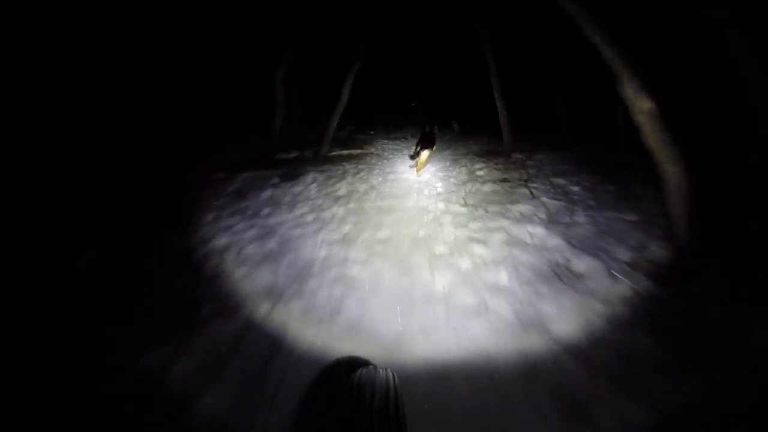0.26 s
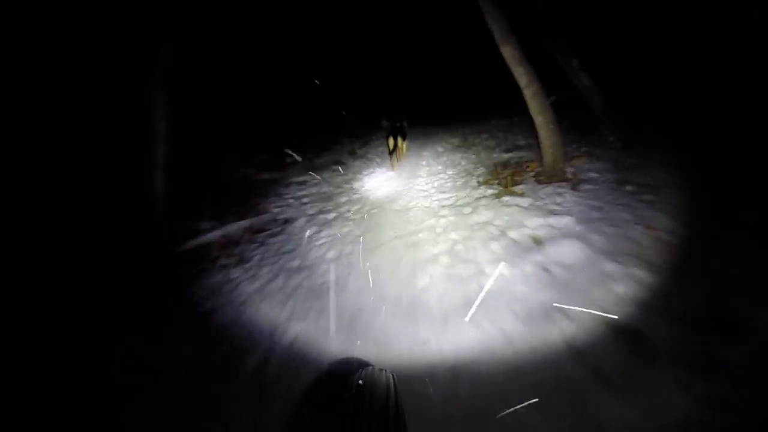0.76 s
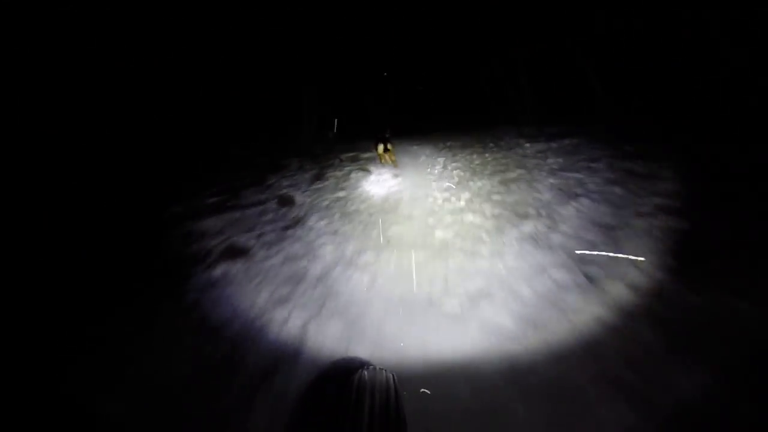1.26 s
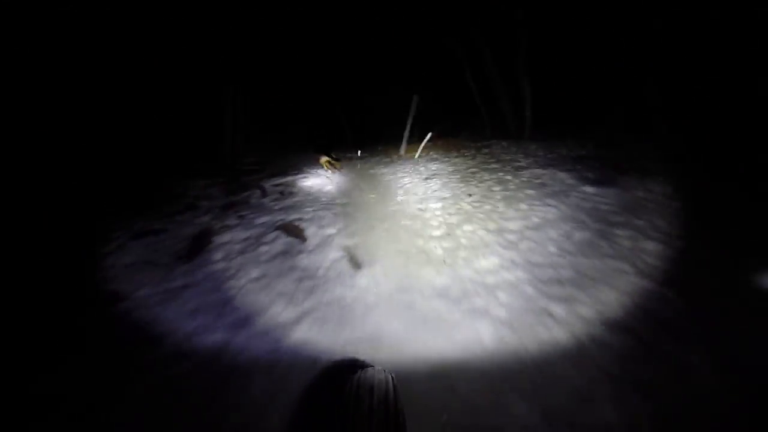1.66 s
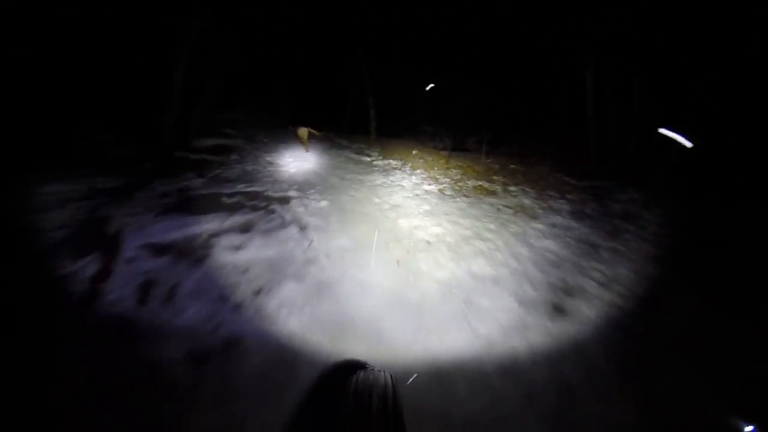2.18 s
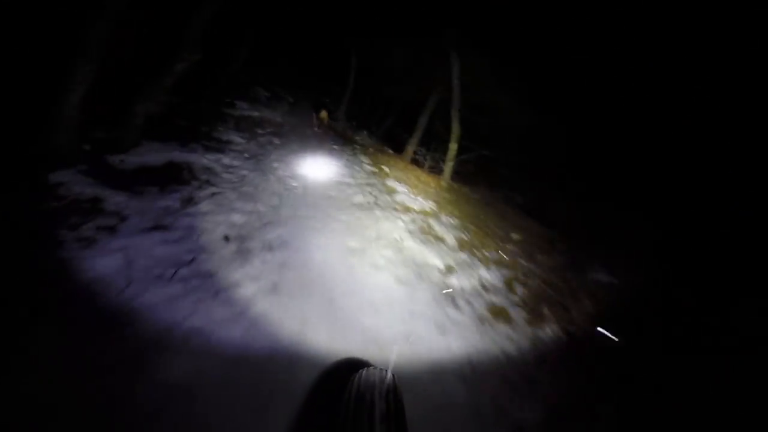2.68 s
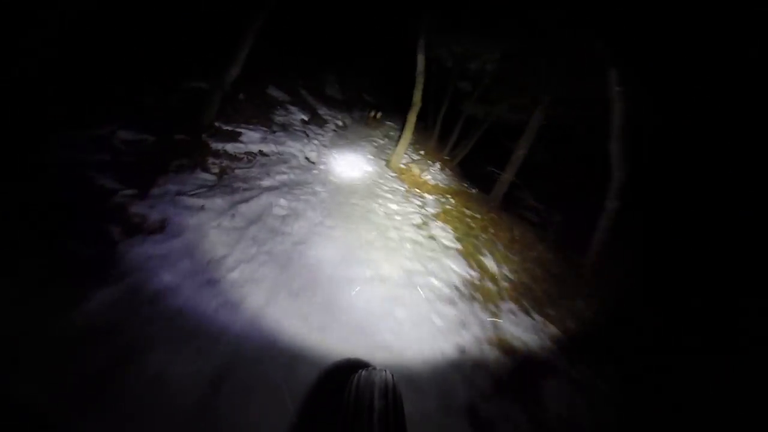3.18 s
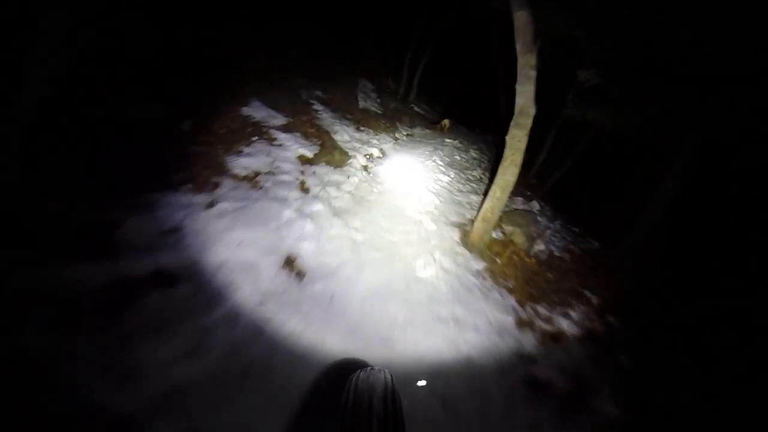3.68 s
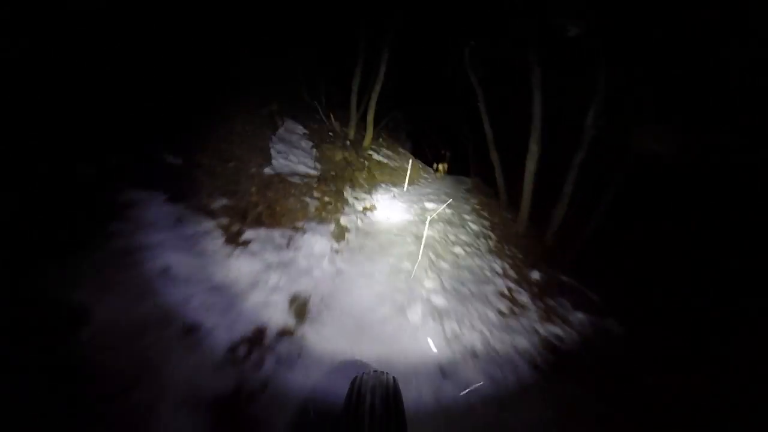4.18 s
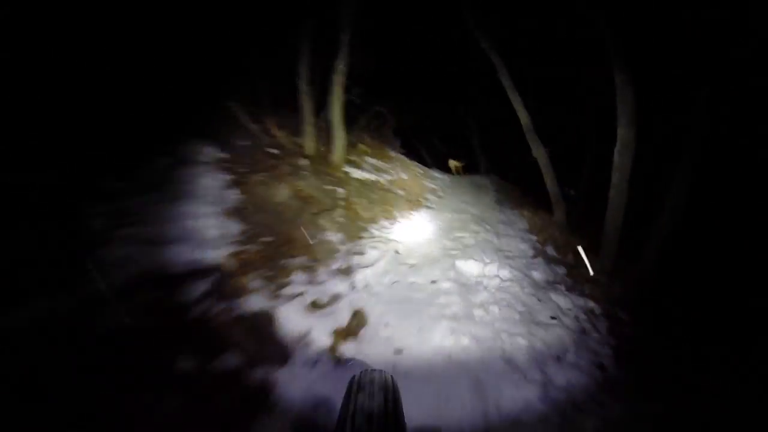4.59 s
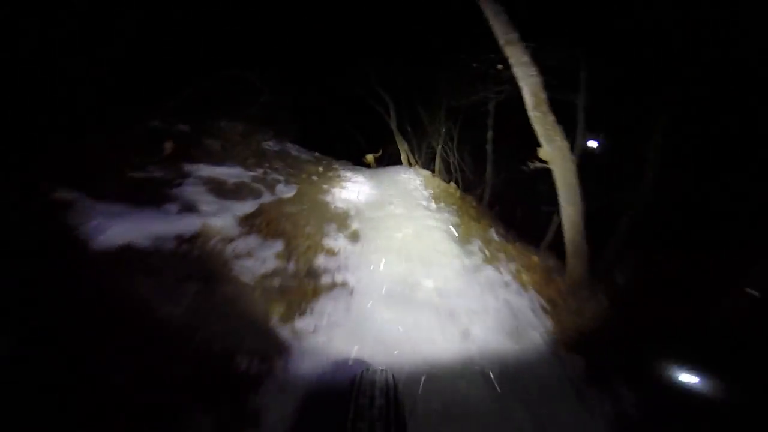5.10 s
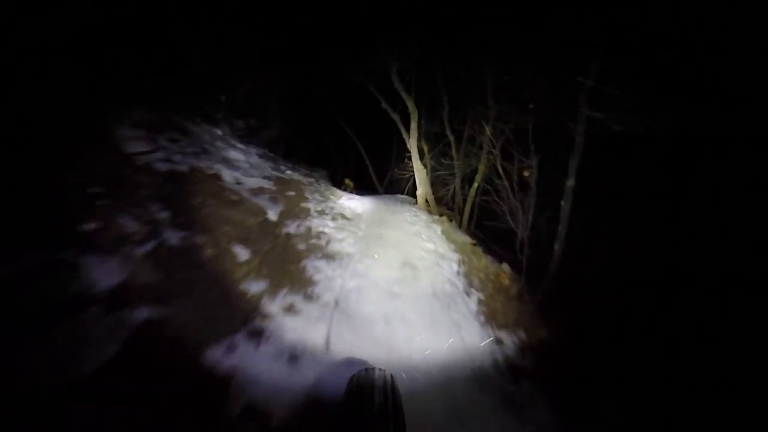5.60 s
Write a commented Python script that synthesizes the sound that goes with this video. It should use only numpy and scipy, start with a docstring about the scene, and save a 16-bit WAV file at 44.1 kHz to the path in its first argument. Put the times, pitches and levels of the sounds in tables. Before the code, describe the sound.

Deep rolling rumble and gritty snow crunch, close on a bike, with case ticks, chain clacks, short brake chirps and low wind buffeting.

```python
"""You hear a deep rumble and crunching snow, with icy ticks, clacks and a brake that hisses and sings.
A fat bike rolls fast down a snowy trail, heard from a cased camera on the handlebar.
The load on the tyres drives rumble and crunch: noise and tiny impacts ring the mount, bar and case.
Crumbs, clacks and knocks are short pushes into resonances; the brake is narrow noise and wavering tones.
Behind it all, low noise makes the buffeting of the headwind."""
import sys
import numpy as np
from scipy import signal
from scipy.fft import rfft, irfft
from scipy.io import wavfile
from scipy.ndimage import uniform_filter1d, minimum_filter1d

SR = 44100
rng = np.random.default_rng(int(sys.argv[2]) if len(sys.argv) > 2 else 0)


def digitize_waveform(pressure):
    """Quantize a signal to 16-bit integers and store it at the path in sys.argv[1].

    Rows of a 2-D input are taken as channels; values are limited to [-1, 1].
    """
    field = np.atleast_2d(pressure).T
    bounded = np.clip(field, -1, 1)
    quanta = np.round(bounded * 32767).astype(np.int16)
    wavfile.write(sys.argv[1], SR, quanta)


N = 257984
T = np.arange(N) / SR  # time in seconds

# Levels in the tables are relative: the layers add their own trims in dB.
# How hard the ground loads the tyres. Each row: time in seconds, load in dB.
RIDE = [(0.0, -15), (0.19, -17.5), (0.49, -18.5), (1.43, -16.5), (2.17, -18.5), (2.36, -14), (2.85, -15.5),
        (3.06, -15.5), (3.52, -13), (4.01, -14), (4.35, -17), (4.97, -18), (5.34, -21.5), (5.85, -20.5)]
# The bike goes light behind a crest. Each row: middle in seconds, length in seconds, drop of the load in dB.
LIFTS = [(0.184, 0.03, 17), (0.454, .045, 5.5), (.595, 0.049, 10), (.685, 0.019, -0.5), (1.057, 0.032, 7),
         (1.754, 0.021, 15), (2.06, 0.075, 6), (2.195, 0.034, 6.5), (2.52, 0.12, 2), (3.1, 0.044, 6.5),
         (3.545, 0.076, 6), (4.385, 0.037, 4), (5.275, 0.077, 12), (5.49, 0.15, 4)]
# The tyres dig into crust and scrunch. Each row: middle in seconds, length in seconds, rise of crunch in dB.
DIGS = [(.13, 0.027, -2), (.96, 0.064, 8.5), (1.725, 0.016, 4.5), (1.92, .08, 4), (2.045, 0.017, 10),
        (2.28, 0.15, 5.5), (2.8, 0.21, 4.5), (3.49, 0.14, 2), (3.96, 0.12, 8), (5.73, 0.038, 3.5)]
# Firm ground sets the bar humming. Each row: time in seconds, hum against the rumble in dB.
FIRMNESS = [(0, -5.5), (.9, -3), (1.7, -7.5), (2.6, -5), (3.2, -4.5), (4.15, -7.5), (5.85, -5.5)]
# Bumps in the trail. Each row: time in seconds, swing of the mount in dB, thud in dB.
BUMPS = [(0.114, -2, -14.5), (0.239, -4.5, -18), (0.324, -2, -31), (0.402, -4.5, -21), (.53, -2, -11),
         (0.72, -3, -15.5), (1.453, -7, -28), (1.524, -4, -19), (1.713, -3, -13.5), (1.941, 1, -21),
         (1.999, -6.5, -19), (2.126, -3, -19), (2.791, -12, -22), (2.862, 4.5, -32), (3.305, -4, -43),
         (3.481, -6, -14), (4.081, -6, -20), (4.136, -4.5, -23), (4.424, -4, -28), (4.764, -7, -43),
         (4.942, -3, -20), (4.995, -5, -41), (5.182, -6, -29), (5.355, -13, -41)]
# Snow thrown up by the front tyre. Each row: time in seconds, fine spray in dB.
SPRAY = [(0, -60), (1.2, -66), (1.8, -62), (2.3, -60), (3.1, -73), (3.6, -70), (4.3, -67), (5.85, -72)]
# Larger clumps of snow bursting on the case. Each row: time in seconds, level in dB.
CLUMPS = [(.05, -39), (.09, -41), (.485, -45.5), (.535, -42), (.728, -38.5), (.935, -39), (1.662, -39),
          (3.347, -44), (4.612, -41), (4.753, -40), (4.998, -33), (5.095, -45), (5.415, -43),
          (5.667, -40.5), (5.70, -38)]
# Larger icy crumbs hitting the case. Each row: time in seconds, snap in dB, ring of the case in dB.
CRUMBS = [(0.0842, -31, -22.5), (0.146, -19, -27), (0.2002, -26.5, -24.5), (0.2786, -22.5, -27),
          (0.3542, -15.5, -18), (0.4352, -27.5, -29), (0.5487, -19.5, -22), (0.7954, -23.5, -28),
          (0.843, -34, -49), (0.8874, -22.5, -24), (0.9287, -40, -24), (0.9845, -17.5, -25),
          (1.061, -31, -28), (1.1173, -24, -29), (1.1877, -23.5, -28), (1.264, -21.5, -36),
          (1.8122, -30, -44), (1.8638, -29, -45), (2.161, -25.5, -27.5), (2.2264, -22.5, -28),
          (2.3017, -18.5, -20.5), (2.404, -29, -22.5), (2.8993, -33, -40), (2.9622, -27, -24),
          (3.3055, -25.5, -17.5), (3.4675, -29, -25), (3.5327, -19.5, -18), (3.674, -30, -22),
          (3.858, -23.5, -22), (4.0135, -22, -19.5), (4.0836, -33, -23.5), (4.139, -24, -25),
          (4.1914, -28.5, -42), (4.2515, -15, -16), (4.2997, -30, -17), (4.4074, -26.5, -24.5),
          (4.475, -19.5, -20.5), (4.7386, -10, -12), (4.9377, -16.5, -16), (5.0489, -17.5, -15.5),
          (5.1382, -32, -27.5), (5.2049, -11, -12), (5.264, -28, -24.5), (5.3561, -23.5, -25),
          (5.407, -29.5, -25), (5.4764, -21, -21), (5.661, -28.5, -33), (5.6933, -38, -30),
          (5.8073, -33, -27.5)]
# Clacks of chain and frame. Each row: time in seconds, level in dB.
CLACKS = [(0.0074, -20), (0.1358, -18.5), (0.4749, -14.5), (0.4825, -13), (0.6672, -16), (0.7112, -24.5),
          (0.83, -19.5), (0.914, -20.5), (1.0243, -10), (1.1194, -6.5), (1.215, -17.5), (1.292, -15),
          (1.505, -17), (1.6058, -14), (1.884, -8), (1.942, -17), (2.2154, -25), (2.7887, -18.5),
          (3.0093, -22), (3.4645, -15.5)]
# Hard knocks on the bar.
# Each row: time in seconds, level in dB, pitch of the struck part in Hz, chatter decay in seconds.
KNOCKS = [(0.323, -9, 2270, 0.0066), (3.454, -13, 703, 0.0034), (3.453, -12.5, 2020, 0.0084),
          (4.901, -31, 2200, 0.0054), (5.211, 6, 2350, 0.0028), (5.446, -16, 2210, 0.0063),
          (5.669, -19.5, 2330, 0.0033), (5.699, -17, 1960, 0.011)]
# Pulls on the brake lever. Each row: start in seconds, length in seconds before letting go,
# time the pads take to close in seconds, rub in dB, singing of the disc in dB.
PULLS = [(0.87, .27, 0.19, -57, -55), (1.42, 0.57, 0.083, -52, -42), (2.25, 0.6, .4, -45, -59),
         (3.78, 0.39, 0.16, -69, -74)]
# Single brushes of the pads on the disc. Each row: time in seconds, level in dB.
BRUSHES = [(2.575, -54), (2.825, -53), (3.167, -36), (3.755, -35)]
# Notes of the singing disc. Each row: middle pitch in Hz, level in dB.
DISC_NOTES = [(6130, 0.5), (8620, -12)]
# The pads catch hard and chirp.
# Each row: start in seconds, length in seconds, middle pitch in Hz, fall in Hz, level in dB.
CHIRPS = [(0.671, 0.037, 8160, 0, -44.5), (1.026, 0.0079, 6080, 100, -32), (1.05, .02, 6070, 100, -34.5),
          (1.103, 0.031, 6200, 450, -30.5), (1.499, 0.011, 6120, 4, -28.5), (1.704, 0.019, 6120, 0, -26),
          (1.866, 0.022, 6150, 0, -27), (1.974, 0.042, 8520, 271, -41.5)]
# Headwind. Each row: time in seconds, buffeting in dB.
HEADWIND = [(0, -21.5), (1.4, -27.5), (2.7, -32), (3.5, -24.5), (4.4, -24), (5.1, -23.5), (5.85, -28)]

# Resonances of the camera case. Each row: pitch in Hz, width in Hz, level in dB.
CASE = [(408, 180, 5), (735.7, 136, 5.5), (820, 39, 3.5), (981.4, 60, 4), (1409, 404, -1.5),
        (1573, 127, -12), (1910, 98, 0.5), (2074, 136, 3.5), (2319, 246, -3.5), (2474, 420, -3),
        (2847, 730, -6.5), (4160, 930, -11.5), (5126, 370, -6), (5480, 250, -9.5), (6000, 430, -9.5),
        (6580, 790, -16.5), (8230, 1400, -27), (10220, 810, -23.5), (11470, 1940, -38.5),
        (14000, 540, -36.5)]
# Resonances of the camera mount. Each row: pitch in Hz, width in Hz, level in dB.
MOUNT = [(61.5, 14, -15), (88.2, 108, -21), (107.3, 28.3, 4.5), (112, 52, -4.5), (144.7, 107, -10.5)]
# Resonances of the handlebar. Each row: pitch in Hz, width in Hz, level in dB.
BAR = [(160.9, 26, 4), (185.6, 51, -2), (210, 137, -12.5), (288.3, 9.2, -9)]

# How strongly breaking snow pushes at each pitch. Each row: frequency in Hz, force in dB.
CRUNCH_FORCE = [(100, -22.5), (400, 1), (1000, 4.5), (2400, 0.5), (3500, -9.5), (6000, -14), (9000, -16.5),
                (15000, -14)]
# The same for crumbling crust. Each row: frequency in Hz, force in dB.
CRUST_FORCE = [(500, -12.5), (1200, -4.5), (2200, 3.5), (2900, -1), (3800, -4), (5500, -8.5), (9000, -6),
               (13000, -24.5)]
# The same for fine snow spray. Each row: frequency in Hz, force in dB.
SPRAY_FORCE = [(2200, -18.5), (5500, -7.5), (8000, -2.5), (10200, -6.5), (12500, 19), (15000, -7)]
# The same for the snap of a crumb. Each row: frequency in Hz, force in dB.
SNAP_FORCE = [(2000, -47.5), (3300, -20), (4800, -0.5), (7000, -4.5), (10000, 5), (15000, 14.5)]
# The same for the ring a crumb leaves in the case. Each row: frequency in Hz, force in dB.
RING_FORCE = [(200, -15), (800, -8), (1100, -12.5), (1500, 2), (1900, 2), (2900, 4), (4000, -10.5),
              (8000, -83)]
# The same for a clack. Each row: frequency in Hz, force in dB.
CLACK_FORCE = [(200, -14), (700, -0.5), (1000, -3.5), (1400, 15), (1600, 5), (2000, -0.5), (4000, -7.5),
               (9000, -1)]
# The same for the upper ring of a clack. Each row: frequency in Hz, force in dB.
CLINK_FORCE = [(800, -27), (1500, 0), (2000, -2.5), (3100, 22), (5000, -21), (9000, -14), (15000, -6.5)]

RUMBLE_DB, CRUNCH_DB = 0.5, -27.5
CRUNCH_PER_LOAD = 0.45  # dB of crunch per dB of load
DIG_HUM_SHARE = 0.35  # part of the rise at a dig that reaches the bar
CLUMPS_PER_S, CLUMP_DECAY_S = 13, 0.0026  # small clumps in the spray
SMALL_CRUMBS_PER_S = 10
SMALL_CRUMB_DB, SMALL_CRUMB_SPREAD_DB = -32.5, 1.5  # snap of the largest; the rest are weaker
PULL_RELEASE_S, DRAG_DB = 0.048, -66.5  # the pads drag faintly between pulls
TOP_HZ = 15500  # the camera keeps nothing much above this


def rumble(load_db, dig_db, hum_db=-0.5, bump_db=-1, thud_db=0):
    """Tread and air shake mount and bar, the bar more on firm ground; bumps thud and swing the mount."""
    # the rolling tread keeps the shaking more even than gusts alone would
    shake = evened(ring(rng.standard_normal(N), response(MOUNT)), window_s=0.0443, share=1.0)
    hum = evened(ring(rng.standard_normal(N), response(BAR)), window_s=0.13, share=0.96)
    firm_db, = curves(FIRMNESS)
    hum_gain = undb(hum_db + firm_db + DIG_HUM_SHARE * dig_db)
    rolling = (shake + hum * hum_gain) * undb(load_db + RUMBLE_DB)

    s, swings_db, thuds_db = np.transpose(BUMPS)
    # a bump compresses the fork, which damps the swing: broad resonances
    swing = response([(40, 140, -16.5), (97.3, 33, 0.5), (190, 63, -10)])
    kicks = ring(blows(s, swings_db + bump_db), swing)
    fork = response([(306, 150, 1.5), (484, 86, -3), (690, 720, -7.0), (1000, 85, -28)])
    thuds = ring(rebounds(s, thuds_db + thud_db, decay_s=0.0049), fork)
    return rolling + kicks + thuds


def snow(load_db, dig_db, powder_db=-2, fling_db=-2, clump_db=2, small_clump_db=-54,
         patchy_db=3.0, crust_db=-3, crumble_s=0.0052):
    """Crystals break in uneven patches, crust crumbles, powder hisses and spray peppers the case in clumps."""
    breaks = grains(rate=4000, spread_db=2.5) * undb(patchy_db * walk(60))
    crunch = unit(ring(breaks, response(CASE, CRUNCH_FORCE)))

    # each piece of crust gives way in a short cascade of fractures
    cascades = ring(np.abs(grains(rate=70, spread_db=2.3)), np.exp(-T[:SR // 20] / crumble_s))
    crust = unit(ring(cascades * grains(rate=6000, spread_db=2), response(CASE, CRUST_FORCE)))
    ground_gain = undb(CRUNCH_DB + CRUNCH_PER_LOAD * load_db + dig_db)
    ground = (crunch + undb(crust_db) * crust) * ground_gain

    spray_db, = curves(SPRAY)
    spray = unit(ring(grains(rate=2800, spread_db=7.0), response(CASE, SPRAY_FORCE)))
    small_clumps = ring(np.abs(grains(rate=CLUMPS_PER_S, spread_db=7.0)),
                        np.exp(-T[:SR // 20] / CLUMP_DECAY_S))
    flutter_db = 5 * walk(59)
    thrown = undb(spray_db + fling_db + flutter_db)
    thrown = thrown + undb(small_clump_db) * small_clumps
    thrown = thrown + undb(clump_db) * swells(CLUMPS, width_s=0.0046)

    hiss = unit(ring(rng.standard_normal(N), response(CASE, SPRAY_FORCE)))
    powder = hiss * undb(spray_db + powder_db)
    return ground + spray * thrown + powder


def crumbs(snap_db=1, body_db=7, small_ring_db=-31):
    """Each crumb snaps on the shell and rings its lower modes; small ones fly between the large."""
    sizes_db = -SMALL_CRUMB_SPREAD_DB * np.abs(rng.standard_normal(size=256))
    times = random_times(SMALL_CRUMBS_PER_S)
    small = [(s, SMALL_CRUMB_DB + db, small_ring_db + db) for s, db in zip(times, sizes_db)]
    s, snaps_db, bodies_db = np.transpose(list(CRUMBS) + small)
    snap_push = rebounds(s, snaps_db + snap_db, decay_s=0.00094, first=0.84)
    body_push = rebounds(s, bodies_db + body_db, decay_s=0.0046, first=0.55)
    return ring(snap_push, response(CASE, SNAP_FORCE)) + ring(body_push, response(CASE, RING_FORCE))


def rattles(clack_db=3, clink_db=-4, knock_db=0, knock_width=0.24):
    """Chain and frame clack through the bar into the case; hard knocks favour the struck part's pitch."""
    s, levels_db = np.transpose(CLACKS)
    clack_push = rebounds(s, levels_db + clack_db, decay_s=0.0067, first=0.59)
    clink_push = rebounds(s, levels_db + clink_db, decay_s=0.0087)
    out = ring(clack_push, response(CASE, CLACK_FORCE))
    out += ring(clink_push, response(CASE, CLINK_FORCE))
    for s, db, hz, decay_s in KNOCKS:
        part = response([(hz, knock_width * hz, 0)])
        knock = signal.fftconvolve(chatter(decay_s), part)
        add(out, s, undb(db + knock_db) * knock)
    return out


def brake(hiss_db=-1, brush_db=0, chirp_db=1, waver_hz=35, rough_hz=65, catch_db=6, sing_db=-5):
    """Pads rub the disc with a thin hiss; a pull makes its notes flutter up, and a hard catch chirps."""
    disc = response([(4030, 350, -10), (4910, 170, 8), (5520, 570, 4.5),
                     (6080, 180, 8.0), (6950, 470, -27.5), (8360, 580, -18.0)])
    rub, singing = undb(DRAG_DB), 0
    for s, length, closing_s, rub_db, note_db in PULLS:
        pull = squeeze(s, length, closing_s)
        rub = rub + undb(rub_db) * pull
        singing = singing + undb(note_db + sing_db) * pull
    pressure = rub * undb(hiss_db + 5.2 * walk(45))
    pressure = pressure + undb(brush_db) * swells(BRUSHES, width_s=0.0087)
    out = unit(ring(rng.standard_normal(N), disc)) * pressure

    for hz, db in DISC_NOTES:
        note_gain = undb(db + catch_db * walk(80))
        phase = 2 * np.pi * np.cumsum(hz + rough_hz * walk(400)) / SR
        out += singing * note_gain * np.sin(phase)

    waver = waver_hz * walk(330)
    for s, length, hz, fall_hz, db in CHIRPS:
        u = np.linspace(0, 1, int(length * SR))  # progress through the chirp
        pitch = hz - fall_hz * (u - .5) + waver[int(s * SR):][:len(u)]
        tone = np.sin(2 * np.pi * np.cumsum(pitch) / SR)
        add(out, s, undb(db + chirp_db) * np.sin(np.pi * u) ** 2 * tone)
    return out


def wind():
    """The headwind buffets the microphone port with deep, fairly even eddies."""
    buffet_db, = curves(HEADWIND)
    port = response([(22, 67, 3.0), (57.6, 31, 3.0), (353, 130, -28)])
    eddies = ring(rng.standard_normal(N), port)
    return evened(eddies, window_s=0.12, share=0.53) * undb(buffet_db)


def squeeze(s, length, closing_s):
    """One pull on the lever, from 0 to at most 1: the pads close, hold and let go."""
    closing = np.clip((T - s) / closing_s, 0, 1)
    return closing * np.exp(-np.maximum(T - s - length, 0) / PULL_RELEASE_S)


def chatter(decay_s, size=2048):
    """A dying burst of tiny rebounds, with an energy of 1 spread roughly evenly over frequency."""
    fade = np.exp(-np.arange(size) / SR / decay_s)
    spectrum = rfft(rng.standard_normal(size) * fade)
    burst = irfft(spectrum / np.abs(spectrum)) * np.sqrt(fade)
    return burst / np.linalg.norm(burst)


def rebounds(times, levels_db, decay_s, first=0):
    """Each contact gives a sharp push scaled by first (none at 0), then chatter a moment later."""
    push = first * blows(times, levels_db)
    for s, db in zip(times, levels_db):
        add(push, s + 0.00056, undb(db) * chatter(decay_s))
    return push


def blows(times, levels_db):
    """One sharp push, a single sample long, at each time."""
    push = np.zeros(N)
    at = np.clip(np.asarray(times) * SR, 0, N - 1).astype(int)
    np.add.at(push, at, undb(levels_db))
    return push


def grains(rate, spread_db):
    """Random tiny impacts, rate of them per second on average, many weak and a few strong."""
    size = undb(spread_db * np.minimum(rng.exponential(size=N), 5))
    return (rng.random(N) < rate / SR) * size * rng.choice([-1, 1], N)


def response(modes, force=((1, 0), (2, 0)), size=8192, skirt=1.178):
    """How a set of resonances rings after one contact with the given force spectrum; peak 1."""
    f = np.arange(size // 2 + 1) * SR / size
    gain = sum(undb(db) / (1 + (2 * (f - hz) / width) ** 2) ** skirt for hz, width, db in modes)
    force_hz, force_db = np.transpose(force)
    gain = gain * undb(np.interp(np.log(f + 1), np.log(force_hz), force_db))
    # fold the cepstrum so that the ring starts at the contact, never before it
    cepstrum = irfft(np.log(gain))
    cepstrum[1:size // 2] *= 2
    cepstrum[size // 2 + 1:] = 0
    shape = irfft(np.exp(rfft(cepstrum)))[:size // 2]
    return shape / np.abs(shape).max()


def ring(push, shape):
    """Every push sets off a copy of the shape, scaled by its strength."""
    return signal.fftconvolve(push, shape)[:N]


def evened(x, window_s, share):
    """Take a share of the random swelling out of a shaking motion; rms 1."""
    power = np.abs(uniform_filter1d(x ** 2, int(window_s * SR))) + 1e-6
    return unit(x / power ** (share / 2))


def walk(rate):
    """Random levels held 1 / rate seconds, then smoothed twice; rms 1."""
    k = max(int(SR / rate), 1)
    held = rng.standard_normal(N)[np.arange(N) // k]
    return unit(uniform_filter1d(uniform_filter1d(held, k), k))


def swells(table, width_s):
    """A brief bell-shaped swell for each row of time in seconds and level in dB."""
    s, db = np.transpose(table)
    t = T[:int(6 * width_s * SR)]
    bell = np.exp(-.5 * ((t - t.mean()) / width_s) ** 2)
    return ring(blows(s - t.mean(), db), bell)


def humps(table):
    """A smooth rise and fall for each row of middle in seconds, length in seconds and height in dB."""
    return sum(db * np.exp(-(2 * (T - s) / length) ** 2) for s, length, db in table)


def curves(table):
    """Each column after the time, joined by straight lines."""
    s, *columns = np.transpose(table)
    return [np.interp(T, s, c) for c in columns]


def random_times(per_s):
    """Moments scattered by chance at a mean rate per second."""
    times = np.cumsum(rng.exponential(size=256)) / per_s
    return times[times < T[-1]]


def add(track, s, sound):
    """Mix a sound in at time s in seconds."""
    i = int(np.clip(s * SR, 0, N - 1))
    track[i:i + len(sound)] += sound[:N - i]


def undb(db):
    """Turn decibels into a gain."""
    return 10 ** (np.asarray(db) / 20)


def unit(x):
    """Scale to rms 1."""
    return x / np.sqrt(np.mean(x ** 2))


def scene():
    """Everything that reaches the camera on the bar, as one channel."""
    ride_db, = curves(RIDE)
    load_db = ride_db - humps(LIFTS)
    dig_db = humps(DIGS)
    rolling = rumble(load_db, dig_db) + snow(load_db, dig_db)
    return (rolling + crumbs() + rattles() + brake() + wind())[None]


def record(dry):
    """The camera sheds the deepest bass, eases its gain down around the loudest peaks and cuts the top."""
    x = signal.sosfilt(signal.butter(2, 16, "high", fs=SR, output="sos"), dry)
    ceiling, hold = .9, int(.006 * SR)  # full scale is 1; hold is in samples
    needed = ceiling / np.maximum(np.abs(x), ceiling)
    gain = uniform_filter1d(minimum_filter1d(needed, hold), hold)
    top_cut = signal.ellip(8, .2, 70, TOP_HZ, fs=SR, output="sos")
    return signal.sosfilt(top_cut, x * gain)


dry = scene()
out = record(dry)
digitize_waveform(out)
```